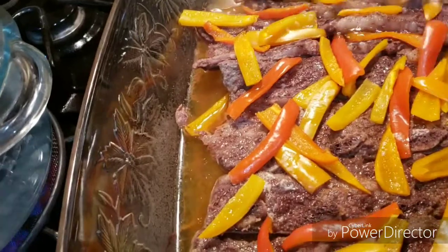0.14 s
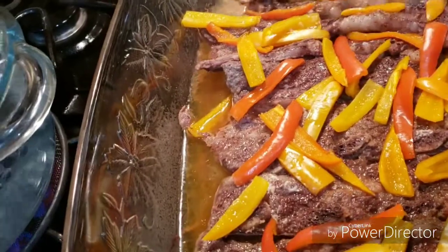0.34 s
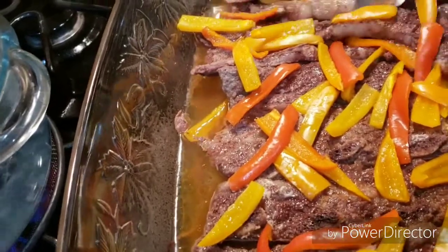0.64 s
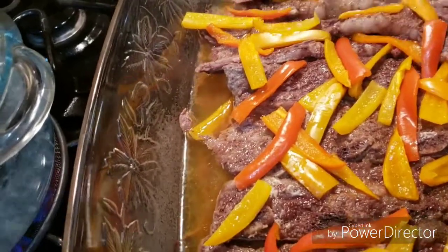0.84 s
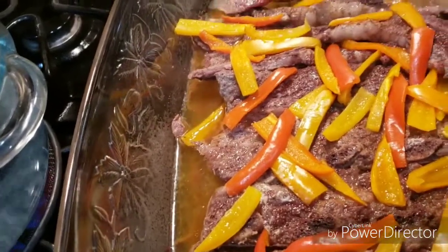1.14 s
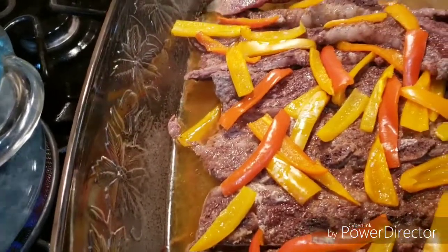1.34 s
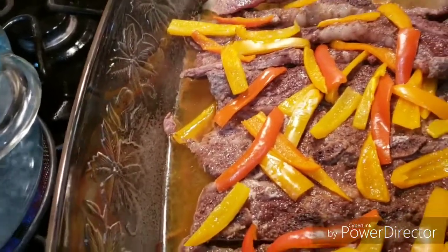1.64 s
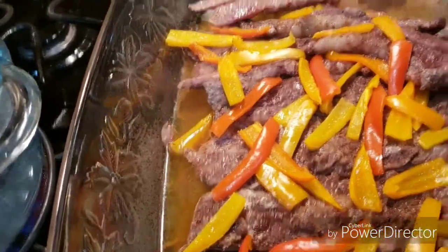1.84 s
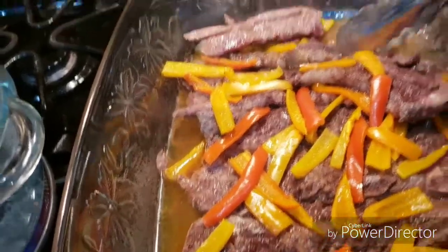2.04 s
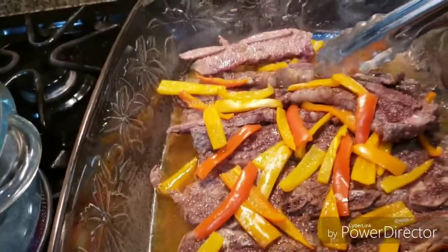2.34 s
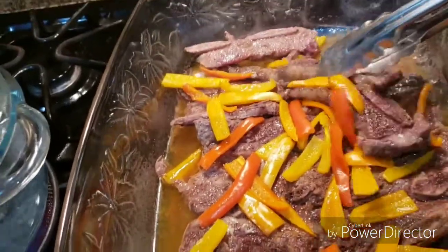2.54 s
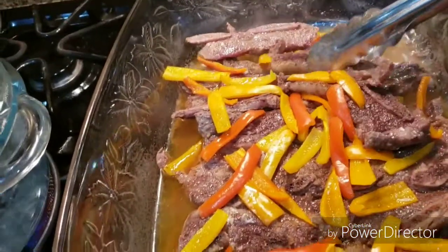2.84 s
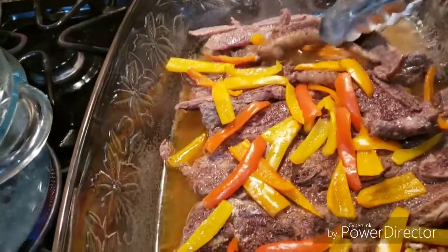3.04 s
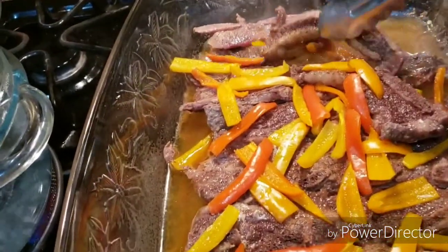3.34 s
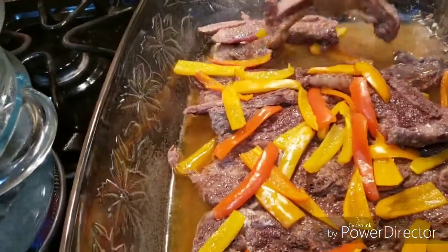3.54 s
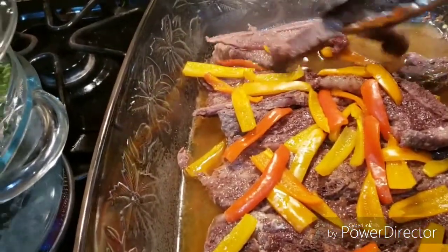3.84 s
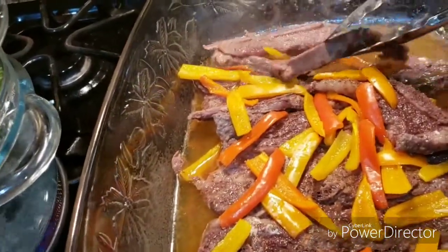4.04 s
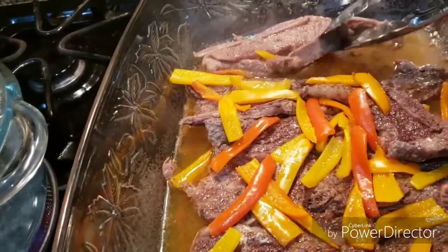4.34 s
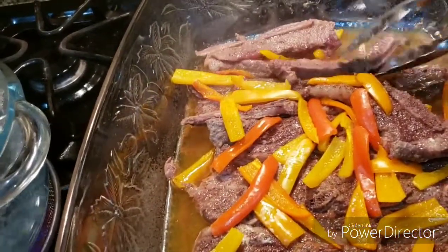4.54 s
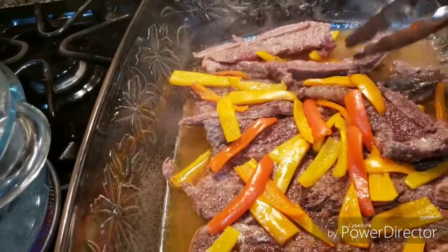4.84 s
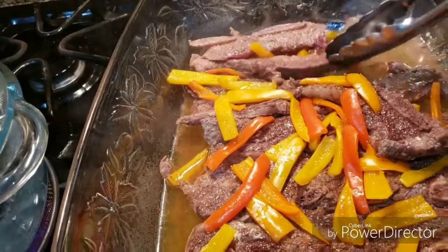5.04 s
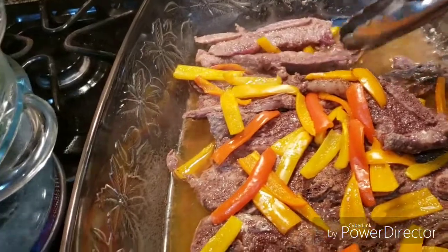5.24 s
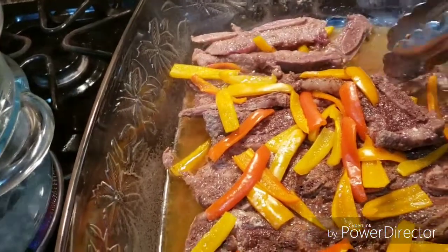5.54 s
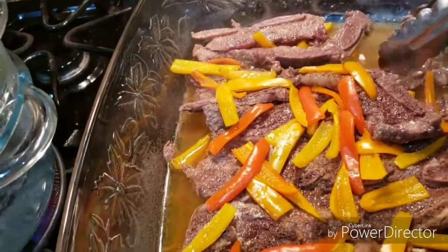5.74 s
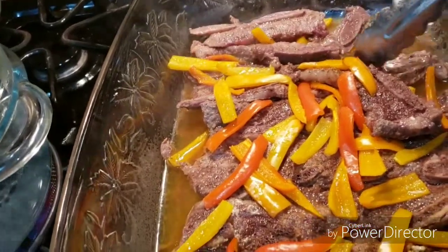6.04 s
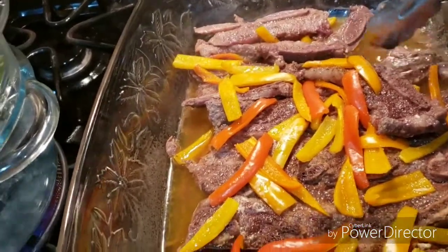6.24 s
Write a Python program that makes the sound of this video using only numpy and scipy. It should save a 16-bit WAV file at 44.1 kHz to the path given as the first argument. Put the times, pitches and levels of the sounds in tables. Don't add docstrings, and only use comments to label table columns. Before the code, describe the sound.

A brief bright drag and a few metallic clicks against glassware, followed by soft moist stirring sounds above a deep motor hum.

```python
import sys
import numpy as np
from scipy import signal
from scipy.io import wavfile
from scipy.ndimage import uniform_filter1d

SR = 44100
rng = np.random.default_rng(int(sys.argv[2]) if len(sys.argv) > 2 else 0)


def boost(x):
    u = np.asarray(x, float) / 20
    return 10 ** u


def generate_wav(signal):
    frames = np.transpose(np.atleast_2d(signal))
    scaled = np.clip(frames, -1, 1) * 32767
    pcm = np.round(scaled).astype(np.int16)
    wavfile.write(sys.argv[1], SR, pcm)


N = 281799
EDGE_HZ = 15500


def evened(x):
    return x / np.sqrt(np.mean(x ** 2) + 1e-20)


def read(points, hz):
    f, value = np.transpose(points)
    return np.interp(np.log(hz + 1), np.log(f + 1), value)


def add(mix, s, sound):
    part = mix[:, round(s * SR):][:, :sound.shape[1]]
    part += sound[:, :part.shape[1]]


def panned(pan_db):
    return boost([[pan_db / 2], [-pan_db / 2]])


def ring(modes, t, spread_db):
    hz, db, t60 = np.transpose(modes)[:, :, None]
    weight_db, phase, detune = rng.standard_normal((3, 2, len(modes), 1))
    turns = hz * (1 + 0.00097 * detune[0]) * t
    apart = np.array([0, np.pi / 2])[:, None, None] * np.sign(phase[1])
    level = boost(db + spread_db * weight_db - 60 * t / t60)
    waves = level * np.sin(2 * np.pi * turns + 3 * phase[0] + apart)
    return waves.sum(1) / np.sqrt(np.sum(boost(2 * db)))


def crack(t, lo_hz, hi_hz, t60):
    band = signal.butter(3, [lo_hz, min(hi_hz, EDGE_HZ)], "bandpass", fs=SR, output="sos")
    burst = signal.sosfilt(band, rng.standard_normal((2, len(t))))
    return evened(burst) * boost(-60 * t / t60)


def glass_dish(t, covered_db):
    # (frequency [Hz], level [dB], t60 [s])
    dish_modes = [(484, -6, .07), (895, -4, .06), (1245, -8, .05), (1780, -15, .07), (2030, -7, .07),
                  (2146, -8, .07), (2333, -3, .08), (2488, -6, .09), (2850, -.5, .07), (2885, -3, .08),
                  (3300, -10, .06), (3470, -6, .08), (4450, -10, .05), (4726, -8, .07), (5500, -11, .045),
                  (6700, -9, .03), (7390, -12, .05)]
    notes = boost(covered_db) * ring(dish_modes, t, spread_db=-2.1)
    body = boost(-5.0) * crack(t, 1080, 6900, t60=0.065)
    sparkle = boost(-20 + covered_db) * crack(t, 5400, 15000, t60=0.055)
    return notes + body + sparkle


def steel_tongs(t):
    # (frequency [Hz], level [dB], t60 [s])
    tip_modes = [(5690, -4, .02), (5890, -5, .025), (6400, -7, .02), (6800, -7, .02), (7000, -4, .032),
                 (7187, 1, .032), (7400, -4, .025), (8110, -7, .02), (8680, -8, .02), (11230, -5, .032),
                 (11780, -7, .03), (11940, -7, .025), (12800, -8, .02), (14395, 0, .03), (14750, -4, .028),
                 (15250, -6, .02)]
    # (frequency [Hz], level [dB])
    head_modes = [(1650, -10), (2210, -7), (3110, -4), (3400, -5), (4086, -3), (4420, -6)]
    tips = ring(tip_modes, t, spread_db=-2.5) + boost(-14.5) * crack(t, 4900, 12700, t60=0.061)
    head_t60 = .035
    heads = ring([(hz, db, head_t60) for hz, db in head_modes], t, spread_db=2.0)
    return tips + boost(-16) * heads


def tong_arms(t):
    late = np.maximum(t - 0.0042, 0)
    first = np.sin(2 * np.pi * 894 * t + [[0], [1.6]]) * boost(-60 * t / .2)
    second = np.sin(2 * np.pi * 968 * t + [[0], [2.2]]) * boost(2 - 60 * t / .09)
    return first * (1 - np.exp(-late / 0.0026)) + second * (1 - np.exp(-late / 0.0028))


def dull_knock(t):
    knock = crack(t, 216, 1010, t60=0.094)
    knock = knock + boost(-13) * crack(t, 780, 2600, t60=0.14)
    knock = knock + boost(-6) * crack(t, 116, 332, t60=0.19)
    return knock + 0.37 * knock[::-1]


def blow(s, glass_db, steel_db, arm_db, knock_db):
    t = np.arange(int(.4 * SR)) / SR
    covered_db = -13 * (s > 1.0)
    glass = boost(glass_db + 0.5) * glass_dish(t, covered_db)
    steel = boost(steel_db + 9.0) * steel_tongs(t) * panned(4.5)
    bright = (glass + steel) * (1 - np.exp(-t / 0.00085))
    return bright + boost(arm_db + 5.5) * tong_arms(t) + boost(knock_db - 1.5) * dull_knock(t)


def add_blows(hits):
    # (time [s], glass [dB], steel [dB], arm [dB], knock [dB])
    blow_list = [
        (.032, -55, -60, -61, -47.5),
        (0.383, -21, -38, -47, -39.5),
        (0.4848, -35.5, -37, -44.5, -43),
        (1.1904, -72, -62, -53.5, -54),
        (1.8462, -42.5, -67, -51, -38.5),
        (2.0251, -33, -22.5, -43.5, -38),
        (2.168, -33, -29.5, -45.5, -43.5),
        (2.3307, -48, -48, -60, -53),
        (4.53, -63, -61, -65, -56.5),
        (5.0235, -72, -64, -54, -49),
    ]
    for s, *levels in blow_list:
        add(hits, s, blow(s, *levels))


def add_shelf(hits):
    # (level [dB], frequency [Hz], t60 [s])
    rocking = (-21.5, 207, 0.084)
    db, hz, t60 = rocking
    t = np.arange(int(.3 * SR)) / SR
    swell = boost(db - 60 * t / t60) * (1 - np.exp(-t / 0.017))
    add(hits, .394, swell * np.sin(2 * np.pi * hz * t) * np.ones((2, 1)))


def puff(peak_db, hz, t60, rise, pan_db, below=0.57):
    t = np.arange(int(.3 * SR)) / SR
    burst = crack(t, hz * below, hz * 1.5, np.clip(t60, .005, .4))
    return boost(peak_db - 5.5) * burst * (1 - np.exp(-t / max(rise, .0003))) * panned(pan_db)


def add_ticks(hits):
    # (time [s], peak [dB], centre [Hz], left minus right [dB])
    tick_list = [(0.0313, -26, 6800, 1), (0.174, -34.5, 5540, -1.1), (0.197, -39, 7230, 6),
                 (.653, -53, 10900, .2), (0.6624, -43, 14500, -3), (0.808, -46, 9000, -4),
                 (.9744, -50.5, 11000, 3.5), (1.1772, -49, 13500, 2.5), (1.294, -41.5, 7250, 3),
                 (1.4666, -55, 14000, 1.1), (4.6264, -40, 8460, 1), (4.7028, -38, 12200, 2),
                 (5.175, -49, 8000, 1.1)]
    for s, db, hz, pan_db in tick_list:
        add(hits, s, puff(db, hz, 0.023, 0.00036, pan_db, below=0.68))


def add_smacks(hits):
    # (time [s], peak [dB], centre [Hz], left minus right [dB])
    smack_list = [(0.058, -38, 6320, -4), (0.0894, -47, 7670, 7.5), (0.705, -47.5, 6450, 9),
                  (1.128, -49, 12000, 4), (1.7729, -57, 14600, -5), (2.516, -47, 13400, -9),
                  (2.5646, -47.5, 8900, 0), (2.763, -56, 14800, 5.0), (3.0565, -53, 14100, 2),
                  (3.468, -49, 12900, 9), (3.7524, -49, 7460, 7), (3.868, -45, 6900, 4),
                  (4.0607, -53, 14300, -3), (4.4129, -54, 12700, 6), (4.7, -39, 13000, -2.1),
                  (4.786, -44, 14800, 0.6), (5.0963, -46.5, 7250, 0), (5.3, -63, 9000, 1.2),
                  (5.53, -52, 9000, 1.2), (5.819, -48, 7020, 0), (5.8474, -39, 15160, 0.2),
                  (6.1095, -43, 14500, -2.2), (6.3444, -52, 14900, -3)]
    for s, db, hz, pan_db in smack_list:
        add(hits, s, puff(db, hz, 0.098, 0.0047, pan_db))


def add_scuffs(hits):
    # (time [s], level [dB], t60 [s], rise [s], left minus right [dB])
    scuff_list = [
        (0.293, -46, 0.37, 0.0013, 4),
        (6.118, -39.5, 0.32, 0.051, 7),
    ]
    for s, db, *shape in scuff_list:
        add(hits, s, puff(db, 2260, *shape, below=0.094))


def noise(spectrum, size, patchy_db, flicker_db):
    # (frequency [Hz], left-right likeness [-1 to 1])
    likeness = [(60, 0.89), (130, 0.95), (290, 0.87), (640, -0.15), (1410, -0.11), (3100, -0.098),
                (6820, -0.019), (15000, -0.0017)]
    frames, hz = 4 * N // size + 5, np.fft.rfftfreq(size, 1 / SR)
    a, b, c, d, patches = rng.standard_normal((frames, len(hz), 5)).T
    patches = evened(uniform_filter1d(uniform_filter1d(patches, size=8, axis=0), size=12, axis=1))
    flicker = evened(uniform_filter1d(rng.standard_normal(frames), size=4))
    same = np.clip(read(likeness, hz), -1, 1)[:, None]
    left = a + 1j * b
    z = np.array([left, same * left + np.sqrt(1 - same ** 2) * (c + 1j * d)])
    z *= boost(read(spectrum, hz)[:, None] + patchy_db * patches + flicker_db * flicker)
    out = signal.istft(z, nperseg=size, noverlap=3 * size // 4)[1][:, :N]
    return out / np.sqrt(np.mean(out.mean(0) ** 2))


def drift(column):
    # (time [s], room [dB], hum [dB], steady rustle [dB])
    slow_levels = [(0, -55.5, -64, -66.5), (.5, -56.5, -53.5, -66.5), (1.05, -56, -52, -70.5),
                   (1.55, -55, -49.5, -68.5), (1.8, -53.5, -51.5, -68), (2.1, -51.5, -48, -65.5),
                   (3.4, -53.5, -48, -67), (4.0, -52, -48.5, -65), (4.6, -52, -47, -64.5),
                   (5.3, -52.5, -51, -62.5), (6.0, -51.5, -48, -63), (6.39, -51.5, -53.5, -63)]
    rows = np.array(slow_levels)
    return boost(np.interp(np.arange(N) / SR, rows[:, 0], rows[:, column]))


def stirring(column, steady):
    # (start [s], length [s], wet rustle [dB], scrape [dB])
    stir_list = [(.39, .1, -62, -57), (0.486, 0.13, -70, -75), (0.7, 0.13, -64.5, -65.5),
                 (0.916, .08, -68, -77), (1.115, 0.19, -73, -75.5), (1.284, 0.15, -67.5, -73.5),
                 (1.608, 0.051, -64.5, -84), (1.79, 0.16, -66, -73), (2.03, .11, -60, -66.5),
                 (2.188, 0.078, -73, -61.5), (2.35, .1, -67.5, -76), (2.506, 0.018, -55.5, -66),
                 (2.754, 0.041, -61, -67), (2.913, 0.16, -67.5, -78), (3.474, 0.085, -66, -79.5),
                 (3.746, 0.055, -59.5, -77), (3.847, 0.038, -63, -66), (3.928, 0.033, -60.5, -70),
                 (4.046, 0.049, -57, -81), (4.204, 0.056, -67, -89), (4.321, 0.056, -64.5, -73),
                 (4.398, 0.026, -62, -70.5), (4.512, 0.029, -60, -73), (4.693, 0.06, -60.5, -75),
                 (4.768, 0.15, -62.5, -79), (5.684, 0.049, -59, -70.5), (5.842, 0.15, -60, -84),
                 (6.1, 0.035, -58, -70), (6.223, 0.02, -60.5, -82), (6.31, 0.062, -59.5, -70)]
    rise_s, fall_s = 0.0073, 0.022
    t, power = np.arange(N) / SR, steady ** 2
    for row in stir_list:
        start, length = row[:2]
        rise = np.clip((t - start) / rise_s, 0, 1)
        fall = np.exp(-np.maximum(t - start - length, 0) / fall_s)
        power = power + (boost(row[column]) * rise * fall) ** 2
    return np.sqrt(power)


def rustle():
    # (frequency [Hz], level [dB per Hz])
    rustle_colour = [(2530, -18), (4300, -11), (5190, -9), (6310, -4.5), (7090, -1.5), (7660, -5),
                     (8460, -4.5), (10100, -7.5), (12700, -1.5), (14900, -4), (15300, 1.5), (15900, -8),
                     (16200, -43)]
    hiss = noise(rustle_colour, size=256, patchy_db=1.66, flicker_db=0.3)
    return stirring(2, steady=drift(3)) * hiss * panned(4.05)


def scrape():
    # (frequency [Hz], level [dB per Hz])
    scrape_colour = [(710, 8), (1200, 0), (1570, 2), (1750, 10.5), (2400, 2), (2820, 9), (3390, 10.5),
                     (3870, 7.5), (5130, -2.5), (5500, 4), (7150, -56), (12100, -120)]
    rub = noise(scrape_colour, size=512, patchy_db=2.0, flicker_db=1.0)
    return stirring(3, steady=boost(-8) * drift(3)) * rub


def drag():
    # (frequency [Hz], level [dB per Hz])
    drag_colour = [(710, -41), (1200, -14), (1320, -32), (1680, -0.5), (2450, -24), (2730, -7.5),
                   (2920, -14), (3150, -7), (4260, -5), (4800, -5.5), (7410, 0), (9210, -9.5),
                   (14200, -0.5), (15500, -6), (16000, -23)]
    bite_s, before_db, fade_db_per_s = .0315, -8.5, 55
    since = np.arange(N) / SR - bite_s
    level_db = -47.5 + np.where(since < 0, before_db, -fade_db_per_s * since)
    return boost(level_db) * noise(drag_colour, size=512, patchy_db=0.0, flicker_db=0.3)


def popping():
    pops_per_s, pop_t60 = 45, 0.011
    happens = rng.random(N) < pops_per_s / SR
    size = boost(-2.5) * np.minimum(rng.exponential(1, N), 1.6) * happens
    decay = boost(-60 * np.arange(1000) / SR / pop_t60)
    return evened(1 + signal.oaconvolve(size, decay)[:N])


def whir(hz, width):
    pole = np.exp(-np.pi * width / SR)
    slow = signal.lfilter([1], [1, -pole], rng.standard_normal((N, 2)) @ [1, 1j])
    return evened((slow * np.exp(2j * np.pi * hz * np.arange(N) / SR)).real)


def hum():
    # (frequency [Hz], width [Hz], level over the hum [dB])
    fan_modes = [(102.5, 3.3, -15), (153.65, 3.9, -12), (237.9, 13.7, -14.5), (484, 39, -16),
                 (721.5, 2, -25), (825, 2.9, -29.5)]
    tone = np.sqrt(2) * np.sin(2 * np.pi * 119.46 * np.arange(N) / SR)
    fan = sum(boost(db) * whir(hz, width) for hz, width, db in fan_modes)
    return drift(2) * tone + boost(6.0) * drift(1) * fan


def room_noise():
    # (frequency [Hz], level [dB per Hz])
    room_colour = [(18, -66), (31, -36), (40, -14), (59, -4), (85, -14), (103, -5.5), (122, -3), (167, -23),
                   (183, -13.5), (232, -13.5), (312, -15), (394, -22.5), (482, -12), (555, -23.5),
                   (915, -24), (1250, -38.5), (1620, -73), (2750, -120)]
    return boost(2.0) * drift(1) * noise(room_colour, size=2048, patchy_db=0.53, flicker_db=2.0)


def kitchen(x):
    # (frequency [Hz], t60 [s])
    echo_t60 = [(200, 0.42), (1000, 0.45), (2600, .3), (4000, 0.33), (7000, 0.22), (15000, .13)]
    taps = np.zeros((2, SR // 2))
    starts = np.arange(300, SR // 2 - 20, 20)
    at = starts + rng.integers(0, 20, (2, len(starts)))
    np.put_along_axis(taps, at, rng.choice([-1., 1.], at.shape), 1)
    hz, t, z = signal.stft(taps, SR, nperseg=256)
    tail = signal.istft(z * boost(-60 * t / read(echo_t60, hz)[:, None]), SR, nperseg=256)[1]
    return signal.fftconvolve(x, tail / np.linalg.norm(tail[0]), axes=1)[:, :N]


def scene():
    hits = np.zeros((2, N))
    add_blows(hits)
    add_shelf(hits)
    add_ticks(hits)
    add_smacks(hits)
    add_scuffs(hits)
    lifted = np.clip((np.arange(N) / SR - 0.22) / 0.027, 0, 1)
    food = (lifted * (rustle() + scrape()) + (1 - lifted) * drag()) * popping()
    background = (room_noise() + hum()) * panned(-1.03)
    return background + food + hits + boost(-15) * kitchen(hits)


def muted(x):
    hz, t, z = signal.stft(x, SR, nperseg=2048)
    width, bands, muted_percent = 6, 118, 8.5
    top = width * bands
    power = (abs(z[:, :top]) ** 2).sum(0).reshape(bands, width, -1).sum(1)
    level_db = 10 * np.log10(uniform_filter1d(power, size=2, axis=1) + 1e-20)
    wander = rng.standard_normal(power.shape[::-1]).T
    restless_db = 3.5 * evened(uniform_filter1d(wander, size=5, axis=1))
    margin_db = level_db - .8 * np.median(level_db, axis=0) + restless_db
    spared_db = np.interp(hz[:top:width], [1800, 2200, 3000, 4000, 5500, 6200], [7, 1, 1.5, -.5, -.5, 1.5])
    margin_db += spared_db[:, None]
    keep = np.ones(z.shape[1:])
    keep[:top] = np.repeat(margin_db > np.percentile(margin_db, muted_percent), width, axis=0)
    return signal.istft(z * keep, SR, nperseg=2048)[1][:, :N]


def band_limit(x):
    return signal.sosfilt(signal.butter(12, 16800, fs=SR, output="sos"), x)


def record(dry):
    edge = signal.firwin(301, EDGE_HZ + 200, window=("kaiser", 5), fs=SR)
    mix = muted(signal.oaconvolve(dry, edge[None], "same"))
    return band_limit(mix)


dry = scene()
out = record(dry)
generate_wav(out)
```